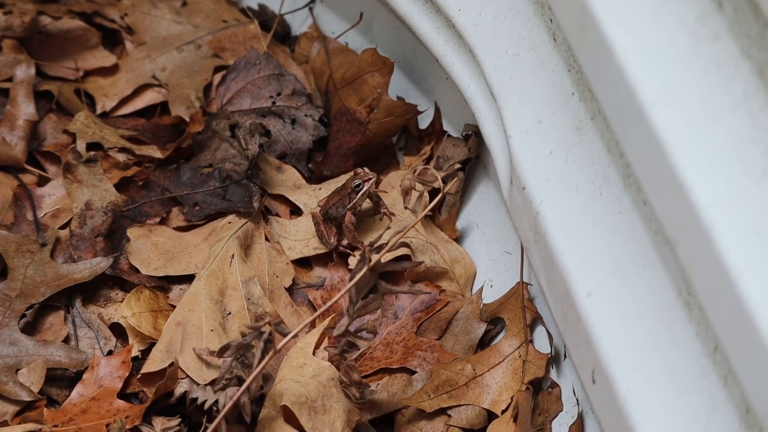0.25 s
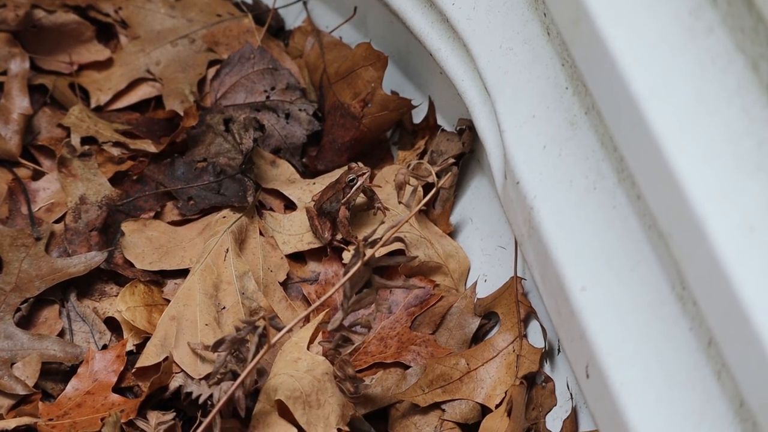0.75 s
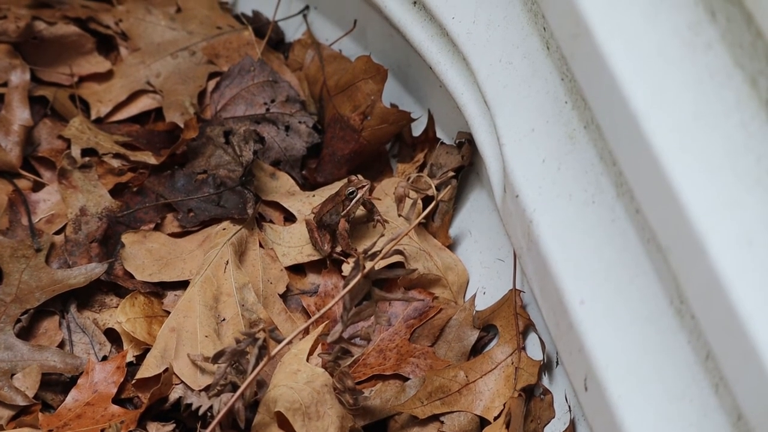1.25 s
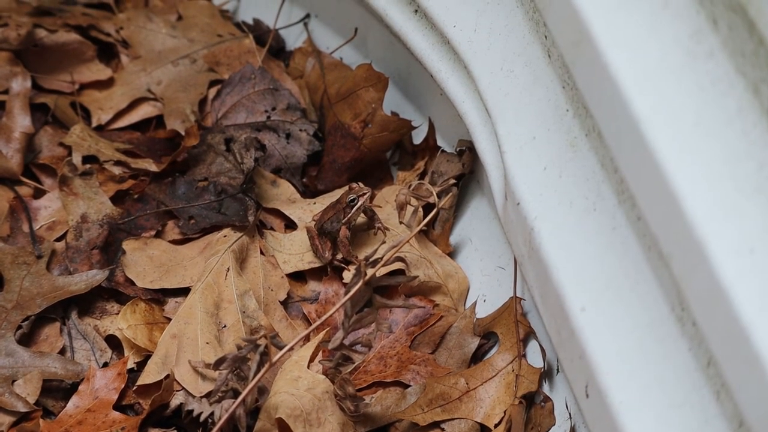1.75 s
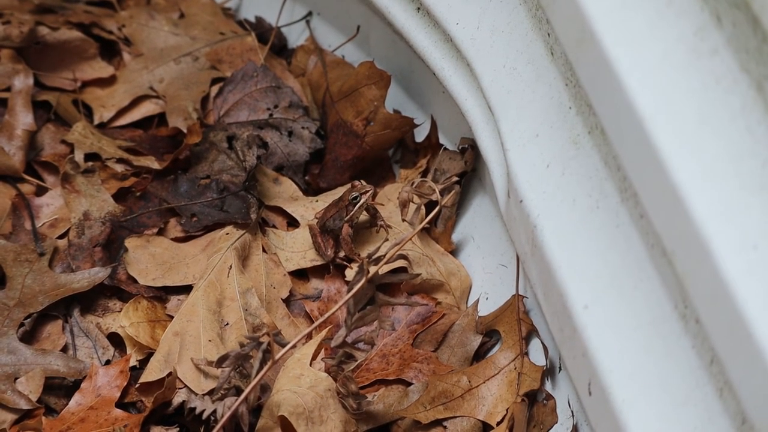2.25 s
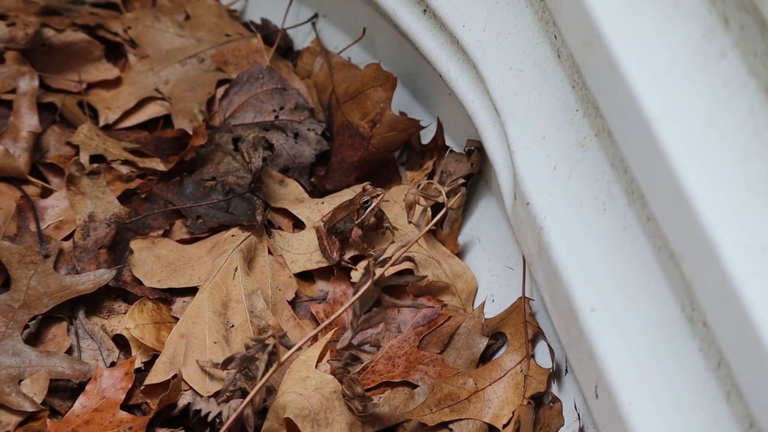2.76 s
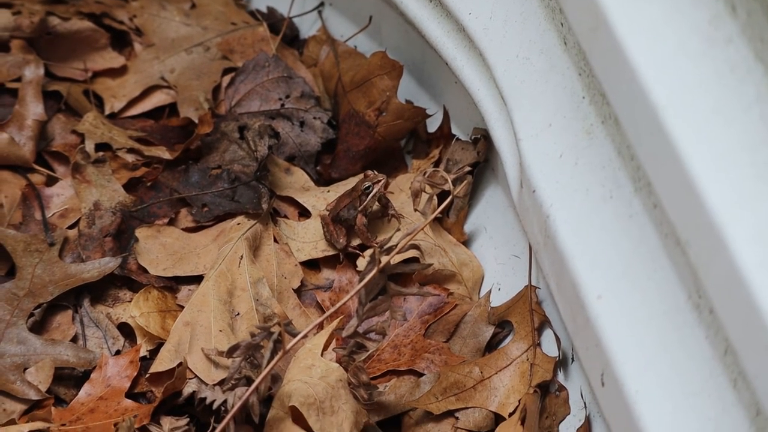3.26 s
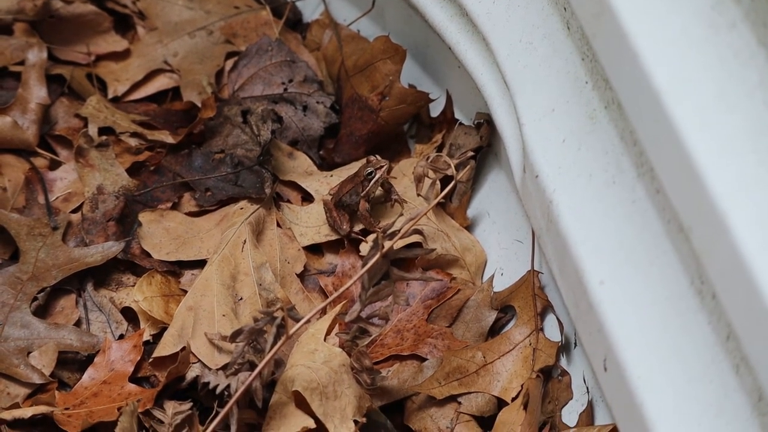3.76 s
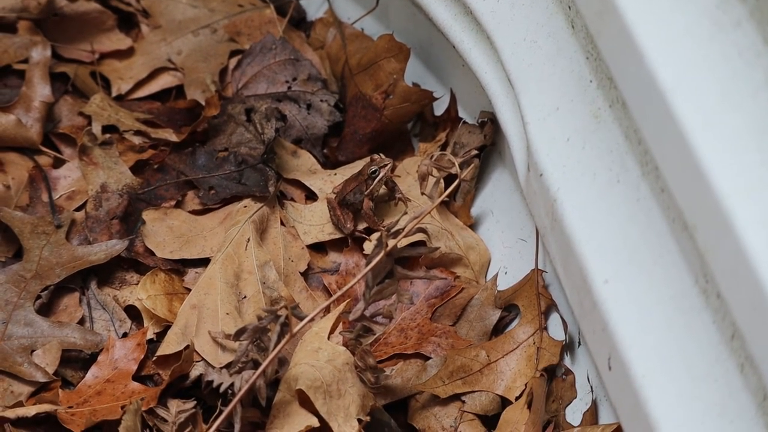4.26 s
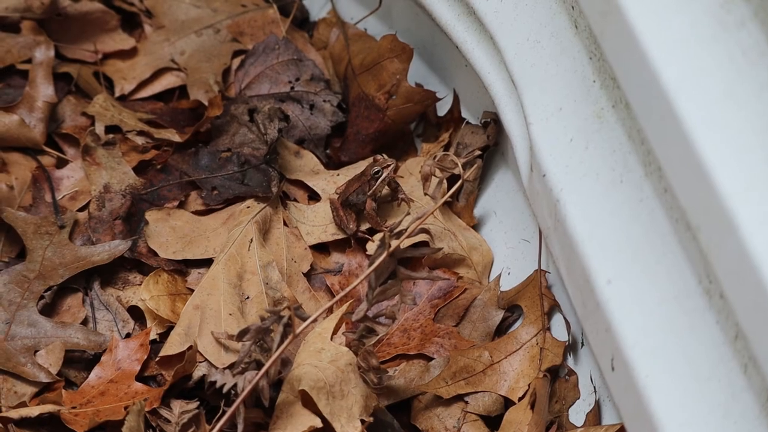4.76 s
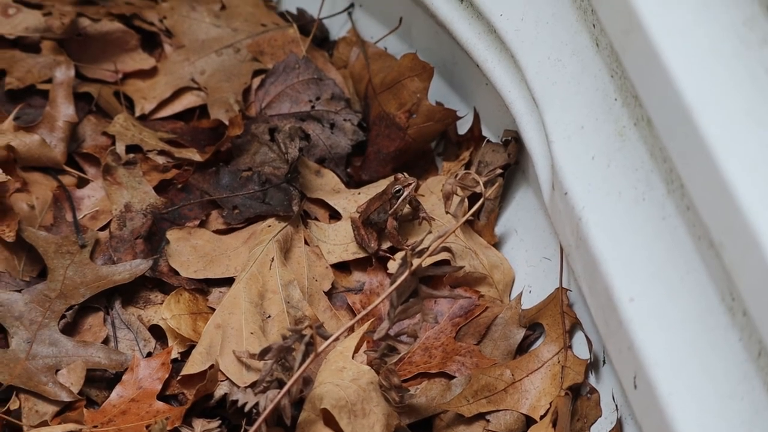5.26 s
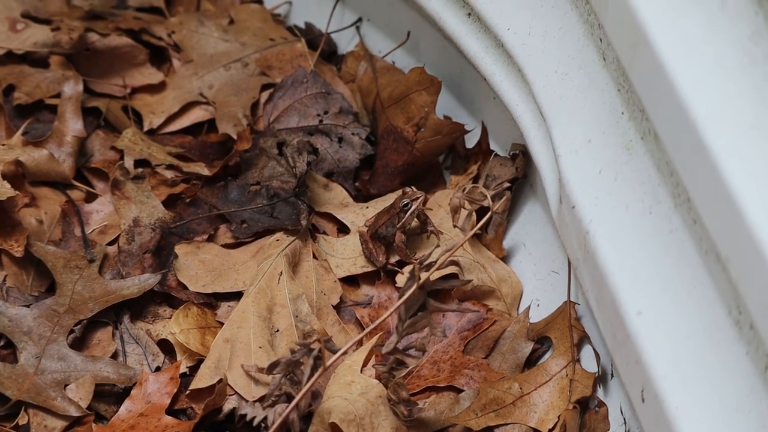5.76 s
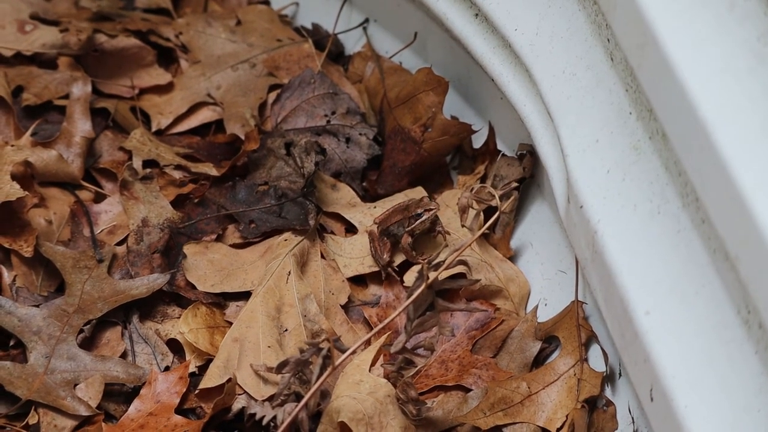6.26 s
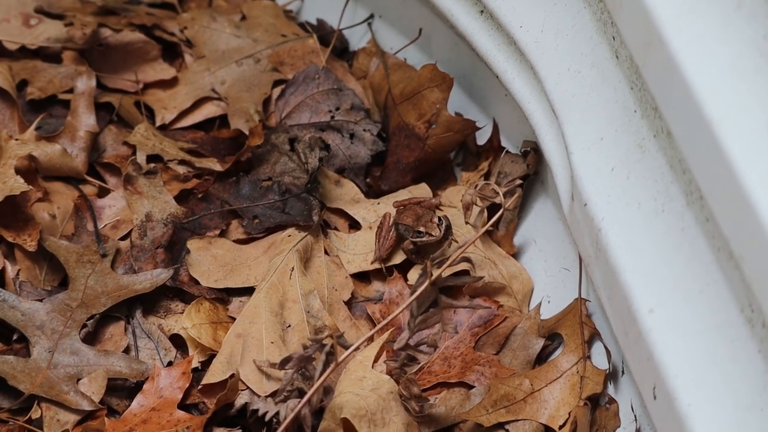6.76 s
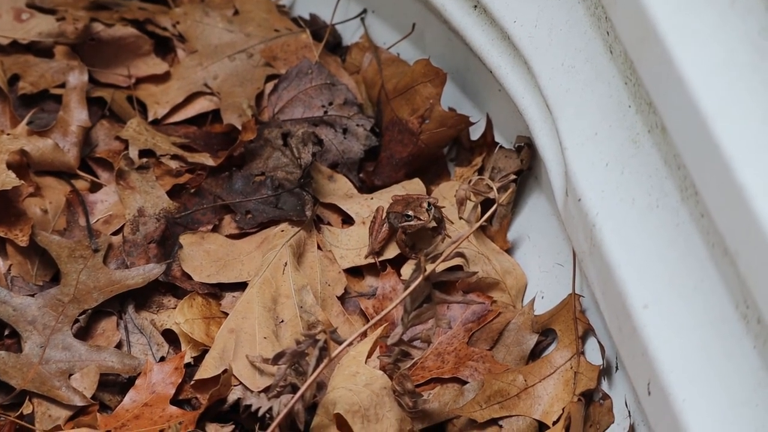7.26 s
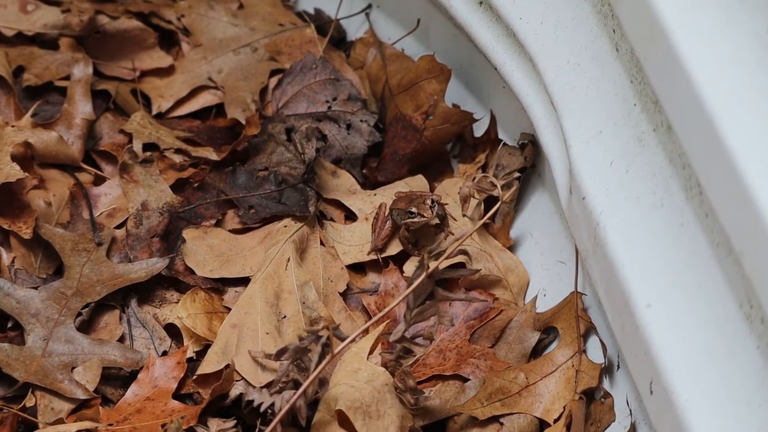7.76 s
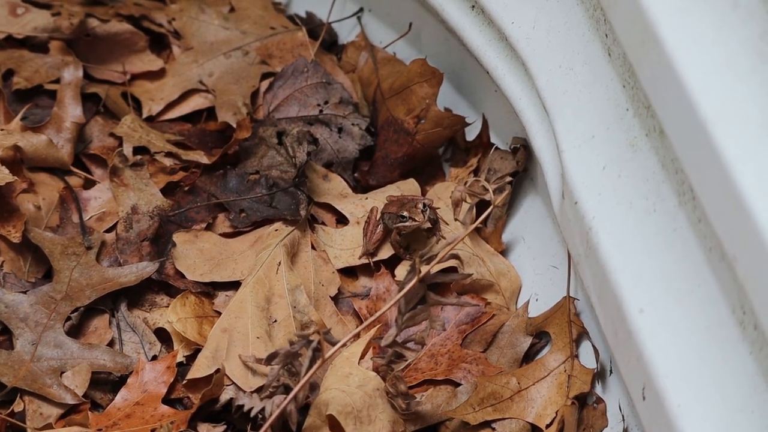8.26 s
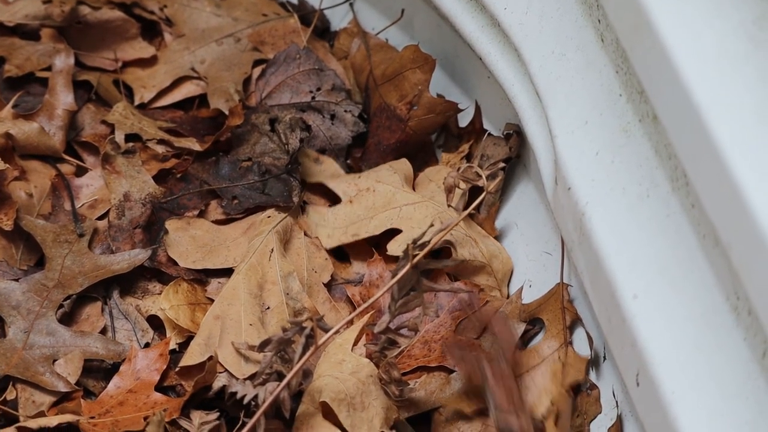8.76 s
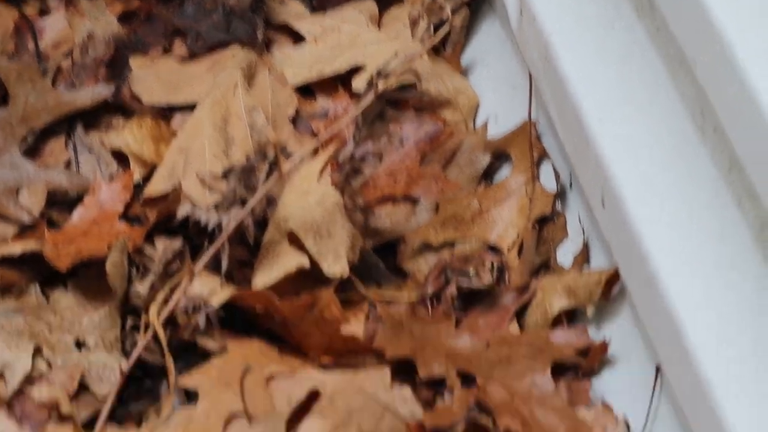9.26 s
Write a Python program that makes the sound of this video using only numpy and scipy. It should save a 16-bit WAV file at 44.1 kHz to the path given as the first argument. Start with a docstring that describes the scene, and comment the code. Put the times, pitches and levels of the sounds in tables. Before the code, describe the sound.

Wood frogs give short hoarse quacks and soft clucks in bursts, with occasional low plops, ringing in a hard hollow over a faint hum.

```python
"""Wood frogs in a hollow

Wood frogs cluck, quack and plop in a hard-walled hollow full of dry leaves. Throat pulses ring a throat,
a vocal sac and a body; quacks add pulsed airy noise as rasp, some also as hiss; plops are falling tones.
Fixed wall modes and sparse reflections ring on after each call. A low outdoor hum of shaped noise
lies under it all, and a noise suppressor holds the hum down and trims the tails."""
import sys
import numpy as np
from scipy import signal
from scipy.io import wavfile
from scipy.ndimage import uniform_filter1d

SR = 44100
rng = np.random.default_rng(int(sys.argv[2]) if len(sys.argv) > 2 else 0)


def master(y):
    """Save y as 16-bit WAV."""
    cut = np.clip(np.atleast_2d(y).T, -1, 1)
    pcm = np.round(cut * 32767)  # scale
    wavfile.write(sys.argv[1], SR, pcm.astype(np.int16))


def how_loud(loudness_db):
    """Turn decibels into a plain amplitude multiplier (0 dB gives 1, 20 dB gives 10)."""
    steps = np.asarray(loudness_db, float) / 20
    return 10 ** steps


N = 419391

SUPPRESS_DB = 14.5  # most that the suppressor takes off a quiet band; the hum is raised by as much ahead of it


def evened(x):
    """Scales to rms 1."""
    return x / np.sqrt(np.mean(x ** 2) + 1e-20)


def peaked(x):
    """Scales to peak 1."""
    return x / abs(x).max()


def levelled(x):
    """Scales so that the loudest 20 ms has rms 1."""
    return x / np.sqrt(uniform_filter1d(x ** 2, size=SR // 50).max())


def read(points, hz):
    """Reads a table on a log-frequency axis."""
    f, value = np.transpose(points)
    return np.interp(np.log(hz + 1), np.log(f + 1), value)


def add(mix, s, sound):
    """Mixes a sound in at time s, trimmed to the ends of the mix."""
    at = round(s * SR)
    part = mix[max(at, 0):][:len(sound) + min(at, 0)]
    part += sound[max(-at, 0):][:len(part)]


def low_pass(x, hz, order):
    """Butterworth low-pass."""
    return signal.sosfilt(signal.butter(order, hz, fs=SR, output="sos"), x)


def resonate(x, hz, width):
    """A steep resonance of gain 1 that can glide: shift down to zero, smooth twice, shift back."""
    turn = np.exp(2j * np.pi * np.cumsum(hz * np.ones(len(x))) / SR)
    r = np.exp(-np.pi * width / SR)
    two_poles = np.convolve([1, -r], [1, -r])
    return 2 * (turn * signal.lfilter([(1 - r) ** 2], two_poles, x / turn)).real


def folds(count):
    """Uneven slaps of the vocal folds, and the puff of air that follows each."""
    pulses_per_s = 150
    chance, air = rng.standard_normal((2, count))
    rate = pulses_per_s * np.exp(0.25 * evened(uniform_filter1d(chance, 150)))
    turns = np.cumsum(rate) / SR + 0.6
    whole = np.floor(turns)
    slaps = np.diff(whole, prepend=whole[0])
    puffs = air * (0.41 + np.exp(-(turns % 1) / 0.35))
    return slaps, puffs


def cluck(db, hz, width, sac_db, fill, growl_db):
    """The pulses swell and stop; throat, vocal sac and body ring with them, wander, and sag as the air runs out."""
    # The vocal sac's resonances. Each row: pitch in Hz at a full call, width in Hz, relative level in dB.
    sac_bands = [(1118, 240, 0), (1392, 406, 5), (1495.7, 368, 6.5)]
    cluck_ms, sac_lag_ms = 26.7, 4  # time scale of the cluck; the sac answers a little after the throat
    wander = 0.037  # rms of the log-pitch drift: throat and sac change shape from pulse to pulse

    slaps, puffs = folds(count=4096)
    u = np.arange(len(slaps)) / SR * 1000 / cluck_ms
    swell = np.clip(u / 0.7, 0, 1) * np.exp(-(u / 1.21) ** 4)
    drive = low_pass((slaps + 0.12 * puffs) * swell, 1862 * fill, order=8)

    sag = 1.07 - 0.083 * np.minimum(u, 1.5)
    drifts = rng.standard_normal((len(sac_bands) + 1, len(u)))
    bends = [sag * np.exp(wander * evened(uniform_filter1d(row, size=400))) for row in drifts]

    body = how_loud(-13) * width / 140 * resonate(drive, 565.4, 180)
    throat = resonate(drive, hz * bends[-1], width) - body

    uneven_db = 1.3 * rng.standard_normal(len(sac_bands))
    sac = np.zeros(len(u))
    for k, (f, w, band_db) in enumerate(sac_bands):
        sign = (-1) ** k  # neighbouring bands push opposite ways
        sac += sign * how_loud(band_db + uneven_db[k]) * resonate(drive, f * fill * bends[k], w * fill)
    sac = np.roll(sac, round(sac_lag_ms * SR / 1000))

    growl = resonate(drive, 330, 170)
    return how_loud(db) * (peaked(throat) + how_loud(sac_db) * levelled(sac) + how_loud(growl_db) * levelled(growl))


def airy(band, later):
    """Pulsed airy noise in one band, swelling and dying; a larger 'later' makes it build later."""
    _, puffs = folds(count=4096)
    ms = np.arange(4096) / SR * 1000
    swell = (ms / 20) ** (0.15 + 0.3 * later) * np.exp(-(ms / 51.4) ** 3)
    return resonate(puffs * swell, *band)


def rasp(low_db, upper_db):
    """The two overtone bands of a hard push, made of pulsed airy noise; the upper one builds later."""
    # The overtone bands. Each row: centre in Hz, width in Hz.
    rasp_bands = [(2040, 760), (3150, 1200)]
    low = how_loud(low_db) * peaked(airy(rasp_bands[0], later=0))
    return low + how_loud(upper_db) * levelled(airy(rasp_bands[1], later=0.93))


def hiss(low_db, upper_db):
    """Two bands of escaping air, pulsed by the folds and dulled at the top."""
    # The bands of the escaping air. Each row: centre in Hz, width in Hz.
    hiss_bands = [(4550, 1500), (6400, 700)]
    low = how_loud(low_db) * levelled(airy(hiss_bands[0], later=1.4))
    upper = how_loud(upper_db) * levelled(airy(hiss_bands[1], later=2))
    return low_pass(low + upper, 8500, order=6)


def plop(db, hz, snap_hz, snap_db, knock_db):
    """A few cycles that fall in pitch, starting at once with a dull snap over a low knock."""
    t = np.arange(4000) / SR
    turns = np.cumsum(hz * (0.8 + 0.9 * np.exp(-t / 0.004))) / SR
    tone = np.sin(2 * np.pi * turns) * np.exp(-t / 0.0079)
    dull_noise = evened(low_pass(rng.standard_normal(len(t)), snap_hz, order=8))
    snap = how_loud(snap_db) * dull_noise * np.exp(-t / 0.015)
    low_noise = evened(resonate(rng.standard_normal(len(t)), 290, 130))
    knock = how_loud(knock_db) * low_noise * np.exp(-t / 0.03)
    onset = 1 - np.exp(-t / 0.0012)
    return how_loud(db) * peaked((tone + snap + knock) * onset)


def hollow(x, direct_db=-5, modes_db=-17, scatter_db=-3):
    """Direct sound, the ringing modes of the walls, and a diffuse tail of sparse reflections."""
    # Standing modes of the walled space. Each row: pitch in Hz, relative level in dB.
    wall_modes = [(285, 1), (345, -4.5), (400, -0.5), (470, -5.5), (519, 2.5), (573, 0.5), (606, 3.5),
                  (653, -5.5), (677, -2.5), (742, 4.5), (770, 1), (821, 3.5), (906, 4.5), (1032, 5.5),
                  (1137, 6), (1178, 2.5), (1230, -2.5), (1258, 3), (1314, 1), (1389, -0.5), (1431, 0),
                  (1468, -3.5), (1532, 2.5), (1608, 1), (1681, -7.5), (1779, -6.5)]
    # Decay of the space. Each row: frequency in Hz, time to fall by 60 dB in seconds.
    decay = [(200, 0.23), (700, 0.33), (1000, 0.32), (1500, 0.32), (2200, 0.32), (3000, 0.28), (5000, 0.18)]
    t = np.arange(SR // 2) / SR
    modes = sum(how_loud(db - 60 * t / read(decay, hz)) * np.sin(2 * np.pi * hz * t) for hz, db in wall_modes)

    taps = np.zeros(len(t))
    slots = np.arange(100, len(t) - 20, 20)  # one reflection at a random place in each 20 samples
    taps[slots + rng.integers(0, 20, len(slots))] = rng.choice([-1., 1.], len(slots))
    hz, frame_s, z = signal.stft(taps, SR, nperseg=256)
    # Tilt of the scatter, with little among the modes. Each row: frequency in Hz, level in dB.
    tilt = [(250, 3), (300, -4), (750, -7.5), (1000, -4), (1800, -8.5), (2400, -3)]
    z = z * how_loud(read(tilt, hz)[:, None] - 60 * frame_s / read(decay, hz)[:, None])
    scatter = signal.istft(z, SR, nperseg=256)[1][:len(t)]

    walls = how_loud(modes_db) * modes / np.linalg.norm(modes)
    walls = walls + how_loud(scatter_db) * scatter / np.linalg.norm(scatter)
    return how_loud(direct_db) * x + signal.oaconvolve(x, walls)[:N]


def hum():
    """Distant steady noise in drifting patches of level, with a few fuzzy tones of narrow-band noise."""
    # Spectrum of the noise. Each row: frequency in Hz, relative density in dB.
    hum_shape = [(20, -39.5), (60, -16), (100, -5), (160, 2), (250, 0), (450, -3.5), (800, -9.5),
                 (1000, -12), (1600, -16), (2500, -22), (5000, -26.5), (11800, -32.5), (12300, -38.5),
                 (16000, -51.5)]
    # Wavering tones. Each row: pitch in Hz, width in Hz, rms level in dB ahead of the raise in scene().
    hum_tones = [(96, 14, -85), (181.7, 13, -74), (288, 32, -77), (472, 53, -79.5)]
    frames, hz = N // 512 + 5, np.fft.rfftfreq(2048, 1 / SR)
    a, b, patches = rng.standard_normal((frames, 1025, 3)).T
    patches_db = evened(uniform_filter1d(uniform_filter1d(patches, 10, 0), 6, 1))
    z = (a + 1j * b) * how_loud(read(hum_shape, hz)[:, None] + patches_db)
    wash = how_loud(-68.5) * evened(signal.istft(z, nperseg=2048, noverlap=1536)[1][:N])
    tones = sum(how_loud(db) * evened(resonate(rng.standard_normal(N), f, w)) for f, w, db in hum_tones)
    return wash + tones


def scene():
    """Frogs at several places in the hollow, each place with its own reflections, over the hum."""
    # All levels here are ahead of the hollow. Clucks and quacks start 14 ms ahead of the listed time,
    # rasps and hisses 12 ms ahead, plops 2 ms ahead.
    # Clucks without rasp. Each row: time in seconds, throat peak in dB, throat pitch in Hz before the sag,
    # throat width in Hz, vocal sac rms in dB re the throat peak, sac pitch as a ratio to a full call.
    clucks = [(0.375, -41, 514, 140, -25.5, .86), (0.836, -36.5, 596, 140.2, -42, .9),
              (0.87, -44, 594, 139, -11.5, 0.98), (0.912, -34, 742, 140.5, -5.5, 1.01),
              (1.561, -49, 519, 140, -35, 0.8), (1.591, -38, 565, 140, -19.5, .88),
              (1.674, -34.5, 580, 140, -9, .9), (1.708, -28.5, 715, 140.9, -11.5, .98),
              (2.041, -29, 740, 161, -8, .99), (2.248, -38, 745, 60.2, -16, 1.2),
              (2.377, -40.5, 509, 139.6, -17.5, 1.1), (2.613, -36.5, 690, 160, -13.5, .8),
              (3.284, -46.5, 454, 139.5, -21, .82), (3.39, -27.5, 841, 69.1, -18, .82),
              (3.465, -41, 486, 159.8, -12, 0.9), (3.559, -30.5, 631, 91, -19.5, .8),
              (3.613, -28.5, 614, 80, -14, .82), (3.701, -16.5, 680, 109.7, -3.5, .95),
              (3.909, -24.5, 766, 139.6, -12.5, 1.1), (4.149, -25, 625, 119.9, -11, 0.84),
              (4.474, -30, 592, 119.9, -21.5, .92), (4.778, -34.5, 596, 138.1, -13, .92),
              (5.549, -43.5, 599, 140.9, -22, .9), (5.575, -46, 590, 139, -22, 1),
              (5.601, -42, 605, 140.2, -16.5, .9), (5.638, -37, 603, 139.5, -24.5, 0.99),
              (6.245, -37, 750, 218.6, -10, 0.93), (6.339, -15, 770, 100, -16, .93),
              (7.376, -41, 472, 139.7, -25, .82), (7.43, -50, 480, 138.8, -20, 0.72),
              (7.553, -40, 760, 158.7, -18, .72), (7.578, -40.5, 520, 159, -12.5, .72),
              (7.621, -32.5, 640, 260, -19.5, .76), (7.642, -38, 705, 258.4, -13.5, .78),
              (7.719, -27.5, 720, 198.8, -12, .9), (8.722, -32, 716, 260.8, -9, .8),
              (9.497, -20, 791, 140.2, -43.5, 1.1)]
    # Quacks, clucks that also rasp. Each row: the columns of a plain cluck, then growl rms in dB re
    # the throat peak, rasp peak in dB, upper rasp rms in dB.
    quacks = [(0.012, -9, 817, 140.3, -12, 1.02, -28.5, -44, -59),
              (1.02, -11.5, 796, 138.2, -5.5, .99, -42, -37.5, -57),
              (1.737, -8.5, 788, 150.5, -13, .98, -32, -39.5, -58),
              (1.789, -19, 749.5, 140, -3, 1.1, -36.5, -42, -61),
              (1.845, -8, 835, 218.5, -10.5, .98, -31, -34.5, -56),
              (2.148, -17, 748, 70.4, -5, 1.017, -47.5, -46.5, -67.5),
              (2.721, -18.5, 724.4, 171, -7, .95, -38.5, -61.5, -84),
              (3.662, -13.5, 697.5, 110, -11.5, .99, -41, -41, -65),
              (3.763, -12, 782, 120, -4, .99, -39.5, -30, -52),
              (3.808, -14, 796, 140, -6, .99, -35.5, -35, -54),
              (4.014, -13, 767, 110.6, -5, .99, -50.5, -38.5, -63),
              (4.217, -16.5, 656, 99.7, -9.5, 1.01, -44.5, -55, -73.5),
              (4.308, -15.5, 760.5, 120.8, -2.5, 1.02, -45.5, -35, -54.5),
              (4.542, -17, 665, 111.3, -9.5, .99, -41.5, -48.5, -75),
              (4.623, -13, 769, 140.9, -5.5, .99, -41.5, -34.5, -57.5),
              (4.74, -16, 661, 120.7, -9.5, .97, -40, -55, -73),
              (4.84, -9, 733, 120.7, -6.5, .99, -33.5, -35, -60),
              (4.948, -8.5, 819, 140, -12.5, .99, -35, -39.5, -59),
              (5.051, -11, 794, 144, -8, .99, -32.5, -40.5, -56),
              (5.207, -16, 753.3, 137.9, -8.5, .99, -40.5, -57, -75.5),
              (5.37, -21.5, 831, 161.1, -3.5, .99, -33.5, -51, -78),
              (5.707, -28, 640, 138.9, 0.2, .97, -28.5, -55.5, -77),
              (5.779, -14, 787, 140, -6, .99, -42.5, -40, -63),
              (6.441, -10, 761, 162, -7.5, .97, -36, -42, -55),
              (6.51, -17, 864, 158.5, -1.45, .99, -33.5, -39, -57.5),
              (6.538, -10.5, 813, 158.8, -7, .99, -28, -37, -53),
              (7.836, -9, 759.4, 238.2, -9.5, 1, -37.5, -43, -55.5),
              (8.262, -13.5, 813, 241.6, -7.5, .95, -33.5, -27, -54.5),
              (8.821, -15.5, 754, 69.46, -8, .96, -34, -50.5, -76),
              (8.899, -24, 815, 159.4, 5.5, 1.04, -36, -42.5, -67.5),
              (8.925, -10, 758, 219.4, -7, .92, -30.5, -39.5, -55.5)]
    # Air hissing out with some of the quacks. Each row: time in seconds, lower band rms in dB,
    # upper band rms in dB, both ahead of the dulling.
    hisses = [(1.03, -67, -79.5), (3.763, -61.5, -69.5), (3.808, -56, -63), (4.015, -64.5, -85.5),
              (4.308, -57, -86), (4.623, -62.5, -84.5), (4.84, -57, -71.5), (6.441, -75.5, -74),
              (6.51, -57.5, -87), (6.538, -56, -72.5), (7.836, -81.5, -63), (8.26, -55, -72.5),
              (8.896, -57.5, -81), (8.925, -57.5, -74.5)]
    # Low, abrupt plops. Each row: time in seconds, peak in dB, pitch in Hz (starts at 1.7 times this and
    # falls to 0.8), top of the snap in Hz, snap in dB, low knock in dB (noise rms before its decay).
    plops = [(0.549, -49.5, 290.8, 890, -13.5, -31.5), (1.868, -26, 417.6, 708, -9.5, -15),
             (3.405, -27, 409, 711, -18, -16.5), (4.376, -16, 500.4, 814, -13.5, -22),
             (5.84, -18, 485.6, 777, -15.5, -21.5), (6.178, -24.5, 525.4, 1889, -9, -20.5),
             (7.747, -55.5, 285.2, 915, -7.5, -34), (7.978, -14, 523, 1099, -18.5, -34)]
    lead_s, air_lead_s, places = 0.014, 0.012, 3

    frogs = np.zeros((places, N))
    for k, (s, db, *row) in enumerate(clucks):
        growl_db = -34.5 + 0.8119 * max(-22 - db, 0)  # fainter clucks are given relatively more low growl here
        add(frogs[k % places], s - lead_s, cluck(db, *row, growl_db))
    for k, (s, *row, low_db, upper_db) in enumerate(quacks):
        add(frogs[k % places], s - lead_s, cluck(*row))
        add(frogs[k % places], s - air_lead_s, rasp(low_db, upper_db))
    for k, (s, *row) in enumerate(hisses):
        add(frogs[k % places], s - air_lead_s, hiss(*row))
    for k, (s, *row) in enumerate(plops):
        add(frogs[k % places], s - 0.002, plop(*row))

    bass_cut = signal.butter(4, 200, "highpass", fs=SR, output="sos")  # the frogs' calls hold little below 200 Hz
    frogs = signal.sosfilt(bass_cut, frogs)
    return (sum(hollow(place) for place in frogs) + how_loud(SUPPRESS_DB) * hum())[None]


def roll_off(x):
    """The treble ends steeply here."""
    return signal.sosfilt(signal.butter(12, 15000, fs=SR, output="sos"), x)


def record(dry):
    """The suppressor lowers bands not well above their usual quiet level, and trims tails far under their peak."""
    forget_db_per_s, tail_under_db = 59.5, 19  # how fast a peak is forgotten; how far under it a tail is trimmed
    z = signal.stft(dry[0], nperseg=512, noverlap=384)[2]
    power = uniform_filter1d(uniform_filter1d(abs(z) ** 2, size=3, axis=0), size=5, axis=1)
    over_db = 10 * np.log10(power / np.percentile(power, 25, axis=1, keepdims=True))

    opened = 1 / (1 + np.exp(-(over_db - 11.5) / 3.1))
    opened = signal.lfilter([0.3], [1, -0.7], opened, axis=1, zi=0.7 * opened[:, :1])[0]

    fall = np.arange(z.shape[1]) * 128 / SR * forget_db_per_s
    under_db = np.maximum.accumulate(over_db + fall, axis=1) - fall - over_db  # how far under the recent peak
    tail = opened / (5.5 + np.exp(-(under_db - tail_under_db) / 2.8))
    gain_db = -SUPPRESS_DB * (1 - opened) - 6 * tail  # the tail term takes off 1.1 dB at most
    kept = signal.istft(z * how_loud(gain_db), nperseg=512, noverlap=384)[1]
    return roll_off(kept[None, :N])


dry = scene()
out = record(dry)
master(out)
```